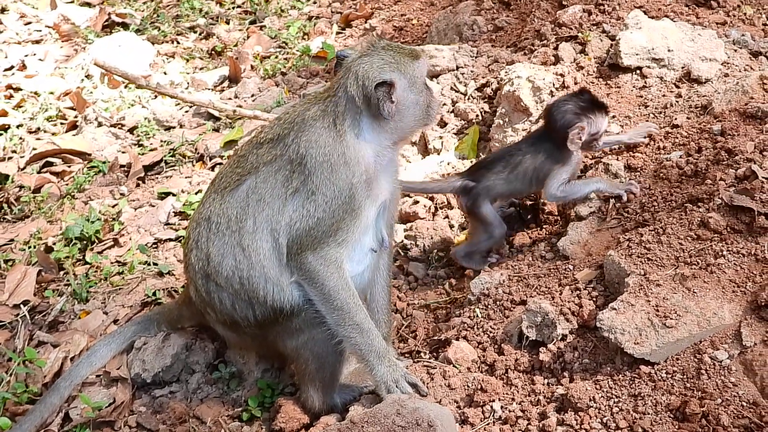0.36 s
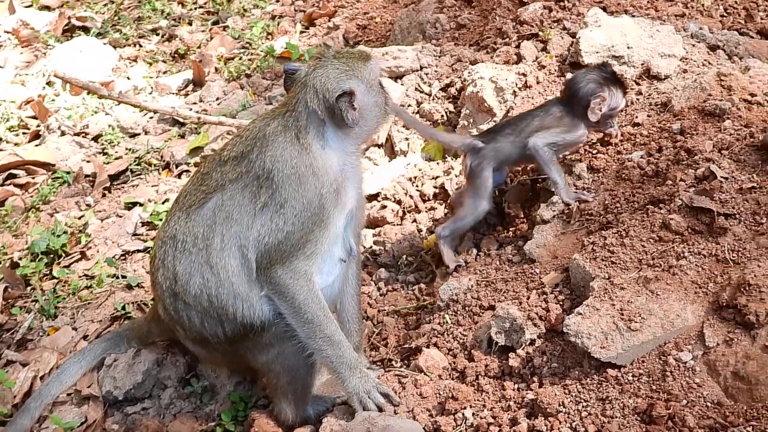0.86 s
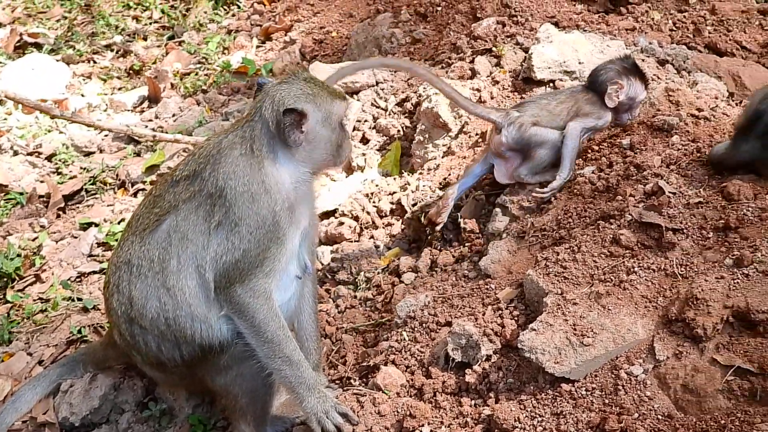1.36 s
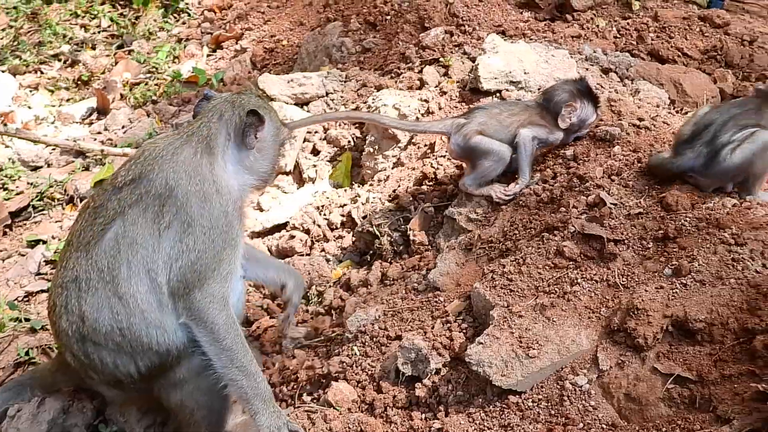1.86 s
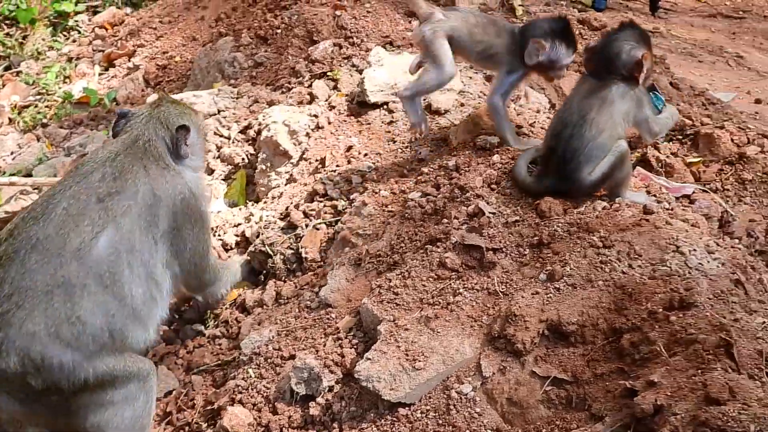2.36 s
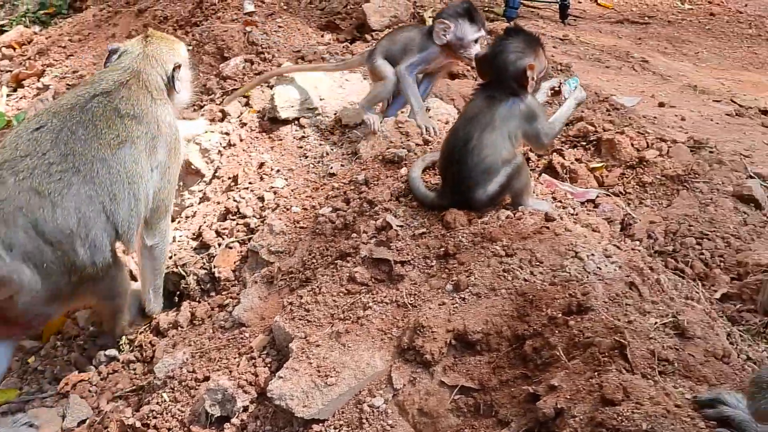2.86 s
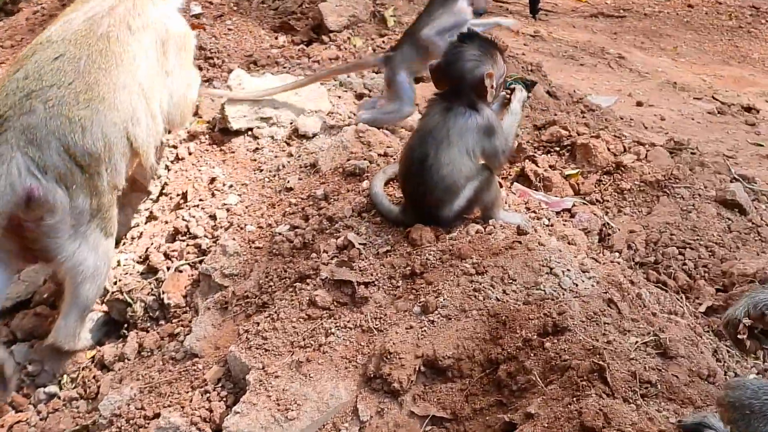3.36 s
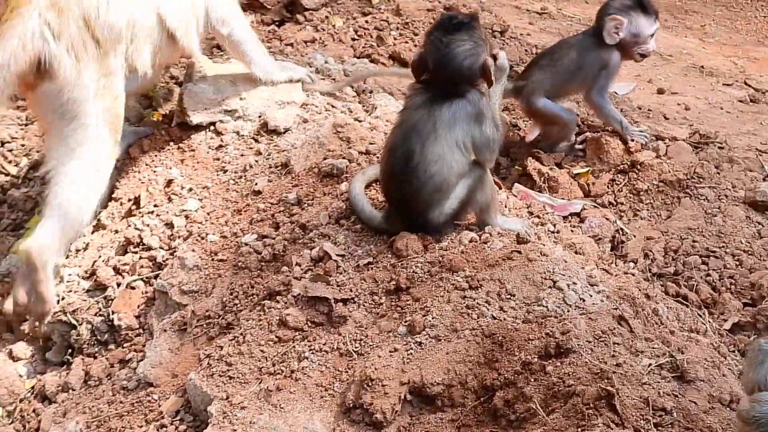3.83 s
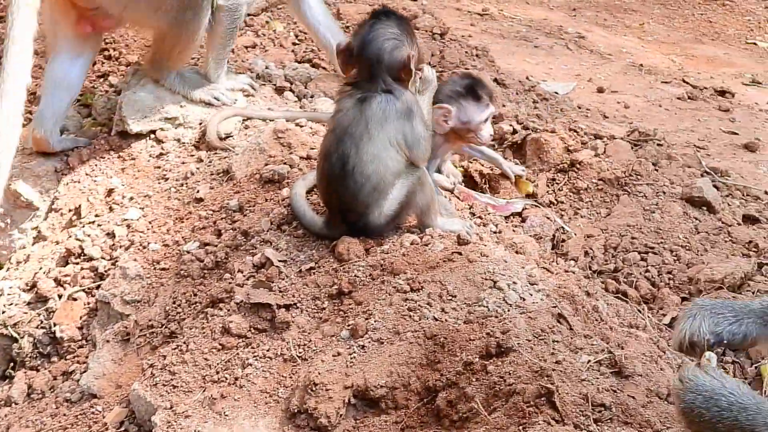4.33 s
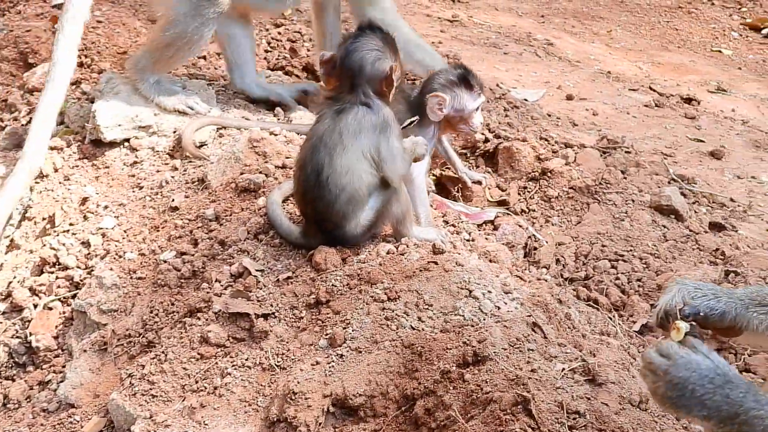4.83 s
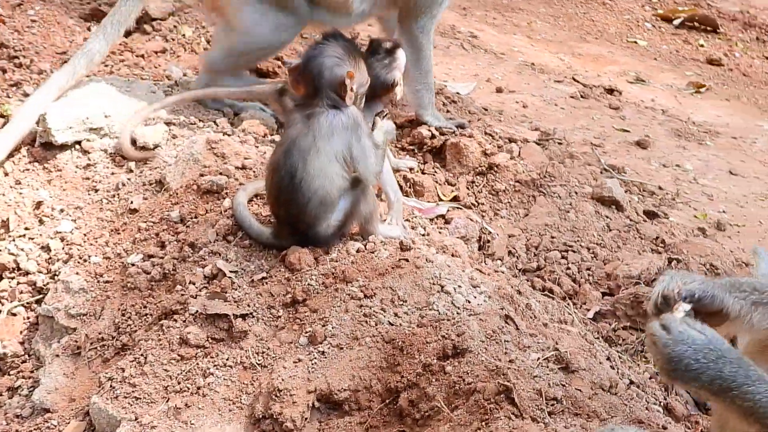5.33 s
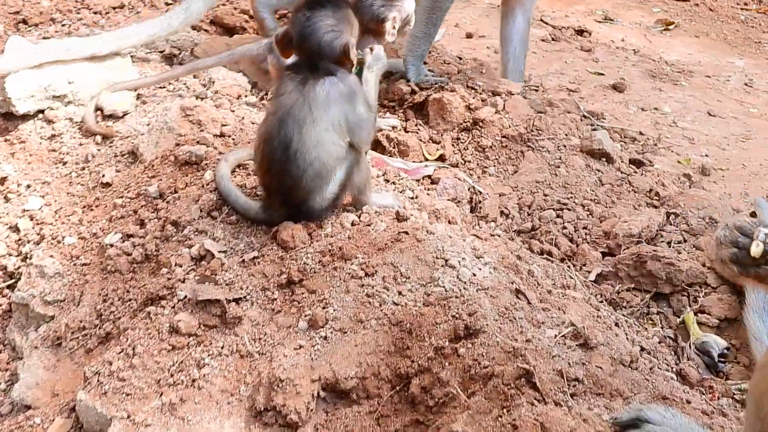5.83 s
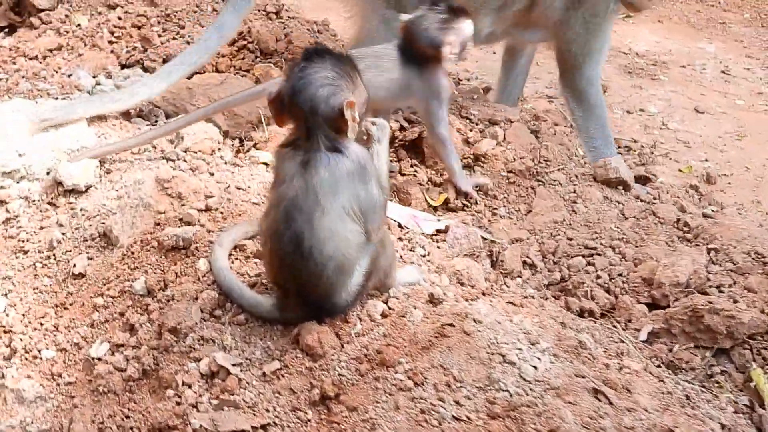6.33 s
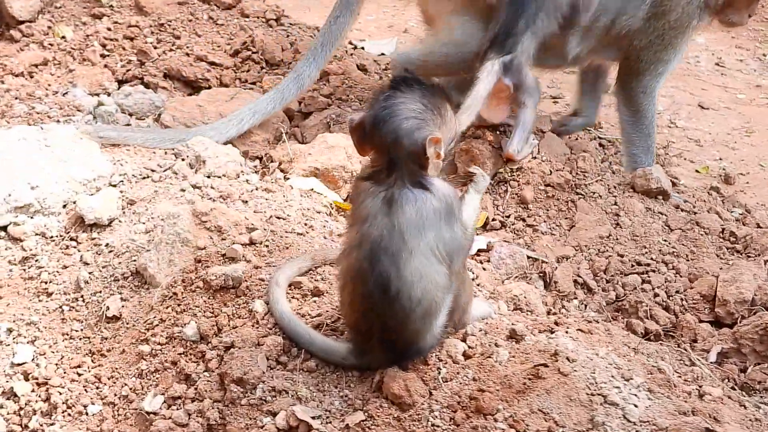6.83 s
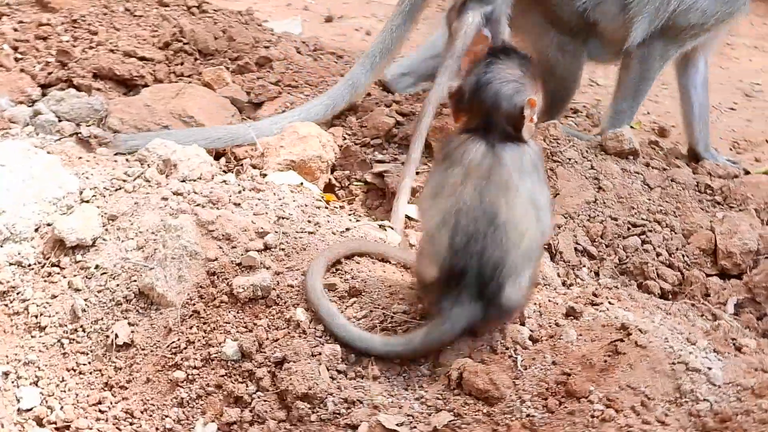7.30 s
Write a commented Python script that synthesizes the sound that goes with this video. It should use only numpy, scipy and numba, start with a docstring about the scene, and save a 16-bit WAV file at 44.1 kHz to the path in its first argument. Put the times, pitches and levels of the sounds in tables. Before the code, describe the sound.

Small feet scuff dry soil and gravel, pebbles tick, birds chirp faintly, then monkeys coo thinly and loudly as a twig snaps near the end.

```python
"""Monkeys coo thinly and clearly, louder at the end, on a mound of dry earth and gravel close to a small
camera with two microphone ports: gliding harmonics with breathy noise, and short single sliding tones.
A bird chirps in quick sine sweeps; noise tails make the echoes of both off the trees.
Feet scuff soil and gravel (coloured grains), stones tick, a twig snaps and a husk tips over (damped rings).
Soft outdoor hiss, made of filtered noise, lies under everything."""
import sys
import numpy as np
from scipy import signal
from scipy.fft import rfft, irfft, next_fast_len
from scipy.io import wavfile
from scipy.ndimage import uniform_filter1d, map_coordinates
from numba import njit

SR = 44100
rng = np.random.default_rng(int(sys.argv[2]) if len(sys.argv) > 2 else 0)


def store_wav(level_fs):
    """Save 16-bit WAV to argv[1]."""
    pcm = np.round(np.clip(np.atleast_2d(level_fs), -1, 1) * 32767)
    wavfile.write(sys.argv[1], SR, pcm.T.astype(np.int16))


def rack_gain(trim_db):
    """Turn a fader trim in dB into the linear factor to multiply a signal by."""
    fader = np.asarray(trim_db, float)
    return 10 ** (fader / 20)


N = 327924
T = np.arange(N) / SR
FFT_SIZE = next_fast_len(N)


def coloured(x, points, band):
    """Filter by (frequency [Hz], level [dB]) points; rms 1 inside the band [Hz]."""
    hz, db = np.transpose(points)
    f = np.maximum(np.fft.rfftfreq(FFT_SIZE, 1 / SR), 1)
    gain = rack_gain(np.interp(np.log(f), np.log(np.maximum(hz, 1)), db))
    spectrum = rfft(x, FFT_SIZE) * gain
    inside = (f > band[0]) & (f < band[1])
    band_power = 2 * np.sum(np.abs(spectrum[inside]) ** 2)
    return irfft(spectrum, FFT_SIZE)[:N] * FFT_SIZE / np.sqrt(band_power)


def walk(rate):
    """Random levels held 1 / rate s and slewed twice; spread near 1."""
    hold = int(SR / rate)
    steps = np.repeat(rng.standard_normal(N // hold + 1), hold)
    return 1.31 * uniform_filter1d(uniform_filter1d(steps, hold), hold)[:N]


def ports(x, lag_samples, pan_db=0.):
    """Both microphone ports hear x; the right one later by a lag, pan_db is left minus right."""
    late = np.fft.rfftfreq(FFT_SIZE) * lag_samples
    right = irfft(rfft(x, FFT_SIZE) * np.exp(-2j * np.pi * late), FFT_SIZE)[:N]
    return np.array([x * rack_gain(pan_db / 2), right * rack_gain(-pan_db / 2)])


def trees(x, t60, alike, gap_s):
    """Scattered echoes from trunks and leaves, partly alike at both ports; unit energy."""
    t = np.arange(int(1.2 * SR)) / SR
    decay = rack_gain(-60 * t / t60) * np.clip(t / gap_s, 0, 1)
    common, left, right = rng.standard_normal((3, len(t))) * decay
    tails = np.sqrt(alike) * common + np.sqrt(1 - alike) * np.array([left, right])
    return signal.fftconvolve(x[None], tails / np.sqrt(np.sum(common ** 2)), axes=1)[:, :N]


def glide(start, length, hz, db):
    """A sine that slides through evenly spaced pitches under a soft swell."""
    u = (T - start) / length
    swell = np.sin(np.pi * np.clip(u, 0, 1)) ** 0.5
    phase = 2 * np.pi * np.cumsum(np.interp(u, np.linspace(0, 1, len(hz)), hz)) / SR
    return np.sqrt(2) * rack_gain(db) * swell * np.sin(phase)


# colour of the distant leaves: (frequency [Hz], density [dB per Hz])
AIR_COLOUR = [(24, -70), (40, -31), (192, 0), (417, 1), (496, -7), (998, -1.5), (2920, -6), (3650, -4),
              (3930, -9.5), (4460, -7), (7710, -7), (10700, -25), (12100, -53), (13300, -76), (15500, -65)]


def air():
    """Distant leaves: smooth hiss, alike at both ports in the bass only."""
    mid, side = (coloured(rng.standard_normal(N), AIR_COLOUR, (40, 15000)) for _ in range(2))
    treble = signal.sosfilt(signal.butter(1, 1800, "highpass", fs=SR, output="sos"), side)
    side = treble * 0.25 + 0.32 * side
    return rack_gain(-53.5 + 0.39 * walk(0.44)) * (mid + side * np.array([[1], [-1]]))


# hiss of far insects and swept leaves: (start [s], end [s], centre [Hz], width [Hz], level [dB])
HISS_BANDS = [(-.15, .22, 5400, 1200, -49), (.49, .7, 3600, 1900, -48), (.6, .74, 2900, 1300, -45),
              (0.9, 1.16, 2760, 940, -54.5), (4.75, 6.1, 1920, 840, -56), (3.15, 3.88, 4600, 260, -55),
              (4.5, 5.0, 7800, 600, -64)]


def hisses():
    """Far insects and swept leaves: narrow wavering noise bands, different at each port."""
    out = np.zeros((2, N))
    for start, end, hz, width, db in HISS_BANDS:
        fade_s = min(0.28 * (end - start), .13)
        swell = np.clip(np.minimum(T - start, end - T) / fade_s, 0, 1) * rack_gain(db + 2.1 * walk(12))
        band = signal.butter(2, [hz - width / 2, hz + width / 2], "bandpass", fs=SR, output="sos")
        noise = signal.sosfilt(band, rng.standard_normal((2, N)))
        out += swell * np.sqrt(SR / 2 / width) * noise
    return out


# blows as the husk tips over: (time [s], level [dB])
HUSK_HITS = [(3.205, -46), (3.21, -41), (3.217, -36)]
# what the hollow husk rings with: (frequency [Hz], level against the blow [dB], time to fall 60 dB [s])
HUSK_MODES = [(313, -4, 0.066), (583, -4, 0.066), (740, -3, 0.061), (976, 5, 0.043), (1086, 0, 0.044),
              (1905, 4, 0.039), (1980, 0, 0.045)]


def husk():
    """A hollow husk tips over: each blow sets all its modes ringing with fresh strengths."""
    out = np.zeros(N)
    for s, blow_db in HUSK_HITS:
        t = np.clip(T - s, 0, 1)
        for (hz, db, t60), chance_db in zip(HUSK_MODES, 2.0 * rng.standard_normal(len(HUSK_MODES))):
            ring = np.sin(2 * np.pi * hz * t) * np.minimum(t / 0.0035, 1)
            out += rack_gain(blow_db + db + chance_db - 60 * t / t60) * ring
    return ports(out, 2.2)


def grains(rate, spread_db, points, band, alike, lag_samples):
    """Many small cracks (rate per second) of uneven size over a sliding hiss, partly alike at the ports."""
    layers = []
    for _ in range(3):
        hit, size, hiss = rng.random(N), rng.exponential(size=N), rng.standard_normal(N)
        strength = rack_gain(spread_db * np.minimum(size, 4.5)) * np.sqrt(SR / rate)
        cracks = (hit < rate / SR) * strength * np.sign(hiss)
        layers.append(coloured(cracks + 1.66 * hiss, points, band))
    return np.sqrt(alike) * ports(layers[0], lag_samples) + np.sqrt(1 - alike) * np.array(layers[1:])


@njit
def svf(x, hz, sharp):
    """State-variable band-pass with a moving centre."""
    y, band, low = np.empty(len(x)), 0., 0.
    for i in range(len(x)):
        g = np.tan(np.pi * hz[i] / SR)
        v = (band + g * (x[i] - low)) / (1 + g * (g + 1 / sharp))
        band, low, y[i] = 2 * v - band, low + 2 * g * v, v / sharp
    return y


def hollows(x, hz, sharp, plain, lift):
    """Gaps between the lumps lift one moving band of the rattle."""
    return plain * x + lift * np.array([svf(v, hz, sharp) for v in x])


def spells(rest_db, rest_hz, rows, rise_s, fall_s):
    """Gain and hollow pitch of a resting sound plus spells (start, length, dB, Hz); 10 dB per rise or fall."""
    power = rack_gain(rest_db) ** 2 + 0 * T
    pull = power * rest_hz
    for s, length, db, hz in rows:
        outside = np.maximum(0, np.maximum((s - T) / rise_s, (T - s - length) / fall_s))
        spell_power = rack_gain(db - 10 * outside) ** 2
        power, pull = power + spell_power, pull + spell_power * hz
    return np.sqrt(power), pull / power


# feet dragged through gravel: (start [s], length [s], stones level [dB], brightness [dB], hollow pitch [Hz])
GRAVEL_DRAGS = [(-.05, 0.21, -53.5, 0, 4960), (0.519, 0.17, -48.5, 3, 3320), (0.795, 0.086, -54, -2, 3500),
                (1.82, 0.068, -51, 3.5, 4100), (1.986, 0.034, -52, -2, 3000), (2.27, 0.058, -55.5, 7, 4200),
                (2.398, 0.073, -51, 3, 3800), (2.605, 0.068, -57, 1, 4100), (2.958, 0.024, -51, 0, 4100),
                (3.122, 0.037, -53.5, -1, 3800), (3.24, 0.039, -55, 10, 3900),
                (4.179, 0.062, -52.5, 4, 4300), (4.27, 0.031, -56, 12, 5230), (4.356, 0.03, -50.5, 9, 5900),
                (4.434, .012, -56, 3, 4500), (5.057, 0.04, -54, 4, 3800), (5.47, 0.23, -56, -11, 3400),
                (5.854, 0.13, -45, 1.5, 3620), (5.933, 0.11, -45, -4, 3800), (6.16, 0.073, -55.5, 5, 4140),
                (6.133, 0.0093, -37.5, 6, 3620), (6.435, 0.057, -45, -15, 4400),
                (6.584, 0.051, -51, -9, 4700), (6.776, 0.029, -34, 1, 3600), (6.819, 0.095, -33, 0, 4830),
                (6.932, 0.093, -33.5, 0.5, 4230), (7.03, 0.024, -32.5, 4.5, 4650),
                (7.063, 0.13, -47, -14.5, 3360), (7.2, 0.08, -48.5, -10, 3500)]


def gravel_drag(busy_db, fine_db, slope):
    """Gain and hollow pitch of one gravel layer; slope is dB of change per dB of brightness."""
    rows = [(s, length, db + slope * bright_db, hz) for s, length, db, bright_db, hz in GRAVEL_DRAGS]
    return spells(busy_db + slope * fine_db, 3800, rows, rise_s=0.014, fall_s=0.018)


# colours of what lies underfoot: (frequency [Hz], level [dB])
SOIL_COLOUR = [(120, -29), (220, -14), (350, 1), (450, -3.5), (700, -3.5), (1000, -9.5), (2000, -51)]
CLOD_COLOUR = [(300, -40.5), (650, 0.5), (1000, 1.5), (1600, 0), (2200, -5), (3500, -51)]
STONE_COLOUR = [(1000, -31), (2200, 0), (3600, -3), (4000, -5.5), (4600, 0.5), (6500, 0), (9000, -35)]
GRIT_COLOUR = [(3000, -45), (5200, -12), (7000, 0.5), (9000, -8), (12000, -20.5), (15500, -50)]
# how busy the feet are, on what and where:
# (time [s], stones level [dB], brightness [dB], left minus right of stones and grit [dB])
FOOT_ACTIVITY = [(0, -47, 1, 2), (.3, -55, 3, 3), (.5, -53.5, 0, -1), (.9, -50, 0.5, 0),
                 (1.4, -56.5, 0, 0.5), (1.8, -52, 2.5, 1.5), (2.2, -57.5, 1, 3.5), (2.6, -53, 4.5, 7),
                 (3.1, -55, -0.5, 5.5), (3.35, -50, -1.5, 2), (3.6, -52, 1, 2), (3.85, -51, 0.5, 5.5),
                 (3.95, -58, -2.5, 1), (4.6, -60, -2.5, 2.5), (4.95, -55.5, -1.5, 1), (5.3, -52.5, 0, 2),
                 (5.8, -48, -0.5, 1), (6.25, -44.5, 0, 1.5), (6.7, -45, -2, 0), (7.15, -44.5, 2.5, -1),
                 (7.44, -47.5, -4, -1)]
# loose soil sliding: (start [s], length [s], level [dB], hollow pitch [Hz])
SOIL_SLIDES = [(-.05, 0.18, -48.5, 520), (0.147, 0.21, -54.5, 412), (0.667, 0.068, -54.5, 395),
               (0.72, 0.29, -45.5, 460), (1.03, 0.21, -47.5, 400), (1.252, 0.2, -49.5, 400),
               (2.09, 0.33, -56.5, 443), (3.2, 0.009, -41, 606), (3.29, 0.45, -53, 443),
               (3.797, 0.27, -52.5, 400), (4.798, 0.42, -52.5, 612), (5.239, 0.025, -45.5, 450),
               (5.42, 0.38, -49.5, 460), (5.78, 0.055, -42.5, 415), (5.853, 0.23, -46, 520),
               (6.124, 0.027, -47.5, 597), (6.415, 0.063, -47.5, 604), (6.582, 0.1, -49.5, 700),
               (6.78, 0.021, -39, 670), (6.815, 0.24, -42.5, 690), (7.394, 0.12, -51, 450)]
# the feet move round to the left: (time [s], extra lag of the right port [samples])
FEET_MOVE = [(5.3, 0.), (5.8, 1.3), (6.7, 1.3), (7.2, 2)]


def scuffs():
    """Feet close by: soil slides dull, clods crumble, stones rattle, grit crackles, all as grains."""
    s, *columns = np.transpose(FOOT_ACTIVITY)
    busy_db, fine_db, pan_db = (np.interp(T, s, c) for c in columns)
    stones_gain, stones_hz = gravel_drag(busy_db, fine_db, 0)
    clods_gain, _ = gravel_drag(busy_db, fine_db, -0.54)
    grit_gain, _ = gravel_drag(busy_db, fine_db, 1.05)
    soil_gain, soil_hz = spells(-58, 520, SOIL_SLIDES, rise_s=0.0062, fall_s=0.041)
    soil = grains(150, 0.89, SOIL_COLOUR, (220, 700), 0.87, 1.5)
    soil = hollows(soil, soil_hz * (1 + 0.11 * walk(10)), 3.73, 0.48, 0.78)
    clods = grains(250, 1.44, CLOD_COLOUR, (1150, 1550), 0.76, 2.0)
    stones = grains(400, 2.5, STONE_COLOUR, (2200, 5800), 0.4, 1.72)
    stones = hollows(stones, stones_hz, 2.13, 0.63, 0.67)
    grit = grains(400, 2.5, GRIT_COLOUR, (7400, 11000), 0.22, 3.0)
    # grit and stones break loose together, in quick spurts
    spurts = walk(70)
    low = soil_gain * rack_gain(1.1 * walk(25)) * soil
    low += clods_gain * rack_gain(-7 + 2.3 * walk(25)) * clods
    high = stones_gain * rack_gain(1.5 * spurts + 1.1 * walk(11)) * stones
    high += grit_gain * rack_gain(-10 + 2.0 * spurts + 2.14 * walk(25)) * grit
    # the bright layers reach the right port later as the feet move left
    late = np.arange(N) - np.interp(T, *np.transpose(FEET_MOVE))
    high[1] = map_coordinates(high[1], [late], order=5, mode="mirror")
    return low + high * rack_gain(np.array([pan_db, -pan_db]) / 2)


def knock(hz, t60, crack, octaves, rise_s, snap):
    """A damped ring with a noisy crack around it and a snap at the start; peak 1."""
    t = np.arange(int(.08 * SR)) / SR
    ring = np.sin(2 * np.pi * hz * t) + crack * rng.standard_normal(len(t))
    y = ring * rack_gain(-60 * t / t60)
    y *= 1 + snap * rack_gain(-60 * t / 0.0027)
    y *= np.clip(t / rise_s, 0, 1)
    edges = [hz / 2 ** octaves, min(hz * 2 ** octaves, 12000)]
    y = signal.sosfilt(signal.butter(3, edges, "bandpass", fs=SR, output="sos"), y)
    y = signal.sosfilt(signal.butter(2, 10500, fs=SR, output="sos"), y)
    return y / np.abs(y).max()


# pebbles trickling at random: (start [s], length [s], middle peak level [dB])
PEBBLE_SPELLS = [(1.6, 2.3, -38), (4.348, .04, -34), (5.86, .2, -33), (6.79, .25, -23)]
# how many pebbles in each of those spells, in that order: (count)
PEBBLE_COUNTS = (5, 8, 8, 16)


def trickles():
    """Small pebbles at chance moments, sizes and spots, as rows like the knocked stones."""
    rows = []
    for (s, length, db), count in zip(PEBBLE_SPELLS, PEBBLE_COUNTS):
        for when, size, pitch, spot in rng.random((count, 4)):
            peak_db = db + 6.3 * (size - .5)
            rows.append((s + length * when, peak_db, 3200 + 2700 * pitch, 14.0 * spot - 1.5))
    return rows


# stones knocked: (time [s], peak level [dB], ring [Hz], left minus right [dB])
STONE_TICKS = [(.5894, -36, 3500, 0), (0.617, -24, 3000, -1), (0.666, -25.5, 3430, 0),
               (1.074, -28.5, 5230, 5.5), (1.2193, -25, 3080, -3), (1.474, -36, 4950, 1),
               (1.5254, -31, 4000, 1), (1.558, -31, 3500, 0), (1.5763, -29, 3680, 0),
               (1.992, -27, 2600, -8), (2.108, -32, 6500, 5), (2.148, -36, 4500, 6), (2.314, -37, 6300, 3),
               (2.442, -35, 3000, 5), (2.468, -27, 3420, 6), (2.556, -32, 4970, 6), (2.58, -27, 3400, 8),
               (2.8645, -25, 6450, 4.5), (2.918, -35, 6000, 2), (3.004, -24, 3550, 5.5),
               (3.259, -36.5, 4530, 19), (3.3145, -34, 6000, 6), (3.3275, -33, 2600, 2),
               (3.4065, -31, 3000, 2), (3.5052, -26.5, 4950, 1.5), (3.5975, -26.5, 4400, 2),
               (3.7268, -26, 4220, -1), (4.182, -34, 5000, 8), (4.2015, -42, 4970, 5),
               (4.215, -31, 3280, 9), (4.228, -34, 5900, 8), (4.284, -40, 6540, 6),
               (4.2372, -29.5, 4300, 9), (4.2747, -37, 5910, 8), (4.296, -30, 6700, 10.5),
               (4.3497, -34, 5970, 8), (4.3794, -39, 5660, 2.0), (4.424, -29.5, 4560, 3),
               (5.107, -23, 6400, 4), (5.484, -37, 5500, 4), (5.843, -33, 6240, -3), (5.9535, -23, 5500, 5),
               (6.0204, -29, 4800, 1.0), (6.039, -28, 4440, 1), (6.103, -29, 8000, 1.5),
               (6.1245, -15, 6500, 5), (6.127, -19, 4000, 6), (6.1318, -15.5, 3700, 11),
               (6.45, -28, 5090, -4.5), (6.485, -33, 5100, -3), (6.7648, -32, 3270, -3),
               (6.796, -26, 2960, 6), (6.8773, -27, 5370, 5), (7.201, -26, 2270, 13)]
# a dry twig snaps: (time [s], peak level [dB], ring [Hz], time to fall 60 dB [s], left minus right [dB])
TWIG_SNAP = (7.0492, -9, 6500, .009, 5)
# dull noisy thuds, from clods landing, the husk's crunch and the rough start of a coo:
# (time [s], peak level [dB], ring [Hz])
DULL_THUDS = [(.617, -34.5, 700), (1.99, -39, 1900), (2.013, -35, 1950), (2.383, -38.5, 900),
              (3.053, -38.5, 406), (6.306, -30, 1600), (3.004, -36, 1320), (3.205, -33.5, 1420),
              (3.212, -37, 2300), (3.213, -27, 700), (5.107, -39, 1530), (5.242, -27.5, 540),
              (5.816, -31, 413), (5.845, -26.5, 1350), (6.15, -39, 800), (6.256, -27.5, 780)]


def knocks():
    """Damped noisy rings: stones and a twig bright and short; clods, husk crunch and a coo's start dull."""
    bright, dull = np.zeros((2, N + SR)), np.zeros(N + SR)
    stones = [(s, db, hz, .013, pan_db) for s, db, hz, pan_db in STONE_TICKS + trickles()]
    for s, db, hz, t60, pan_db in stones + [TWIG_SNAP]:
        y = rack_gain(db) * knock(hz, t60, crack=2.6, octaves=1.6, rise_s=0.0002, snap=.9)
        i = int(s * SR)
        bright[0, i:i + len(y)] += rack_gain(pan_db / 2) * y
        i += 2 + round(np.interp(s, *np.transpose(FEET_MOVE)))  # the right port hears it later
        bright[1, i:i + len(y)] += rack_gain(-pan_db / 2) * y
    for s, db, hz in DULL_THUDS:
        y = rack_gain(db) * knock(hz, 0.018, crack=2.35, octaves=1.2, rise_s=0.0012, snap=0.09)
        i = int(s * SR)
        dull[i:i + len(y)] += y
    return bright[:, :N] + ports(dull[:N], 1.9)


# bird chirps: (start [s], length [s], four evenly spaced pitches [Hz], level [dB])
BIRD_CHIRPS = [(1.495, 0.038, 7170, 6400, 6350, 6170, -41.5), (2.683, 0.037, 6020, 6030, 6470, 7000, -39.5),
               (3.647, 0.018, 7200, 7000, 6870, 6660, -43), (3.661, 0.03, 6500, 6350, 6540, 6960, -37),
               (5.08, 0.027, 7400, 6700, 6360, 6040, -41.5), (5.853, 0.055, 6720, 6450, 6430, 5900, -45.5)]


def bird():
    """Quick, slightly hoarse high sweeps from a tree, mostly heard through near and far echoes."""
    near_db, far_db = 0, -3
    chirps = sum(glide(s, length, hz, db) for s, length, *hz, db in BIRD_CHIRPS)
    chirps = chirps * (1 + .3 * walk(600))
    blurred = chirps * (.5 + .9 * walk(1500))  # moving leaves spread the far echo in pitch
    near = rack_gain(near_db) * trees(chirps, t60=.3, alike=0.28, gap_s=0.0097)
    far = rack_gain(far_db) * trees(blurred, t60=2.4, alike=0.14, gap_s=0.036)
    return ports(chirps, 0.92, -2.2) + near + far


def coo(rows, upper_db, rough):
    """One voice: gliding harmonics weighted by the mouth opening, breaking in hoarse and clearing."""
    s, hz, level_db, mouth_db = np.transpose(rows)
    edge = np.clip(np.minimum(T - s[0], s[-1] - T) / 0.0052, 0, 1)
    unsteady = 1 + .002 * walk(60) + .06 * rough ** 2 * walk(160)
    phase = 2 * np.pi * np.cumsum(np.interp(T, s, hz) * unsteady) / SR
    strong = rack_gain(np.interp(T, s, level_db))
    mouth = rack_gain(np.interp(T, s, mouth_db))
    first, second = strong * np.minimum(1 / mouth, 1), strong * np.minimum(mouth, 1)
    voice = first * np.sin(phase) + second * np.sin(2 * phase)
    # a hoarse voice skips every other beat: a line between the first two harmonics
    voice += .6 * rough ** 3 * strong * np.sin(1.5 * phase)
    # the upper harmonics come in late, fade more slowly than the loud low ones, and flicker
    follow = .33  # share of the low harmonics' dB swing that they follow
    upper = strong ** follow * strong.max() ** (1 - follow)
    onset = np.clip((T - s[0]) / .025, 0, 1) ** 2
    for k, db in zip((3, 4, 6), upper_db):
        voice += upper * rack_gain(db) * rack_gain(3.6 * walk(50)) * np.sin(k * phase) * onset
    # uneven breath spreads a noisy skirt around every partial, widest at the break
    hoarse = rough + .6 * np.exp(-np.abs(T - s[0]) / .012)
    return voice * np.sqrt(2) * edge * rack_gain(0.61 * walk(70)) * (1 + hoarse * walk(500))


# coos, one list each: (time [s], pitch [Hz], level of the stronger of the two low harmonics [dB],
# mouth opening as second over first harmonic [dB])
COO_TRACKS = [
    [(1.2, 991.6, -78, -20), (1.226, 1009, -45, -28), (1.278, 1038, -44.5, -28), (1.38, 1037, -41, -30),
     (1.432, 1031, -62, -20), (1.5, 1028, -52.5, -22), (1.54, 1019, -71, -10), (1.558, 1040, -51.5, -6),
     (1.68, 1013, -65, -8)],
    [(2.745, 860, -46, -24), (2.772, 910, -32.5, -24), (2.787, 910, -32.5, -24), (2.817, 861, -41.5, -21),
     (2.845, 825, -54, -9)],
    [(6.303, 827, -45, 1), (6.314, 835, -24.5, 13), (6.345, 852, -24, 18), (6.41, 846, -26, 15.5),
     (6.435, 856.5, -33.5, 7), (6.48, 850, -36, 3), (6.575, 860, -38.5, 14)],
    [(6.572, 902, -25, 10), (6.594, 907, -29, 2.5), (6.61, 921, -17, 11.5), (6.628, 922.6, -18, 16.5),
     (6.637, 956, -25.5, 3.5), (6.645, 967, -20, 12), (6.66, 951.5, -21.5, 8), (6.672, 874.5, -28.5, 5.5),
     (6.712, 861, -34.5, 0)],
    [(6.787, 858.4, -32, 4), (6.805, 873.2, -24, 6), (6.84, 881.4, -23, 9), (6.88, 880, -25.5, 13),
     (6.92, 881.7, -22, 16), (6.96, 885, -26, 11), (7.0, 880.5, -23.5, 2.5), (7.022, 892.5, -25, 3),
     (7.032, 890, -31, 9), (7.055, 884, -33, 10)],
    [(7.045, 901, -30, 3), (7.07, 890, -37, 5), (7.1, 900, -43, 7), (7.13, 890, -39, 6),
     (7.16, 905, -43, 14), (7.195, 886, -47, 14)],
    [(7.19, 914, -40, 16), (7.22, 909, -48, 14), (7.28, 906, -51, 10), (7.31, 913, -37.5, 25),
     (7.345, 908, -40, 25), (7.38, 917, -34.5, 25), (7.44, 922, -38.5, 9)],
]
# colour of each coo: (third, fourth, sixth harmonic against the stronger low one at its loudest [dB],
# echo [dB], roughness [0-1], left minus right [dB], lag of the right port [samples])
COO_TONES = [(-33, -42, -42, -31, 0.16, 6, 1.9), (-22, -35, -42, -22, 0, -0.5, 1.1),
             (-47, -45, -23.5, -15, 0.07, -2.5, 1.7), (-37, -44, -43, -4, 0.1, -1.5, 1.3),
             (-29.5, -44, -25, -12, 0.14, 0.5, 2), (-24.5, -38, -30, -5, .9, 2, 2.8),
             (-34, -18, -37, -1.5, 0.33, 6.5, 2.8)]
# short single tones, from peeps and from lone overtones and between-harmonic lines of the coos:
# (start [s], length [s], start pitch [Hz], end pitch [Hz], level [dB])
SINGLE_TONES = [(2.72, .0085, 927, 950, -46), (6.432, .029, 1826, 1770, -34),
                (6.445, .044, 1093, 1153, -36.5), (6.556, .029, 1040, 1024, -36),
                (6.569, .037, 1327, 1370, -33.5), (6.575, .04, 3000, 3080, -50),
                (6.585, .06, 5420, 5530, -47), (6.597, .13, 1355, 1328, -48.5),
                (6.625, .04, 3820, 3870, -46), (6.63, .04, 4800, 4830, -49), (6.63, .035, 2850, 2900, -50),
                (6.635, .105, 5500, 5460, -49), (6.66, .06, 2680, 2640, -51), (6.66, .1, 3850, 3880, -51),
                (6.668, .045, 1800, 1720, -29), (7.027, .04, 913, 962, -36), (7.065, .065, 990, 1050, -39),
                (7.128, .042, 1085, 1100, -35.5), (7.171, .03, 1020, 1010, -43),
                (7.245, .05, 870, 885, -42)]


def monkeys():
    """Harmonic coos close to the ports, short single tones (peeps, lone lines of the coos), and echoes."""
    near, far = np.zeros((2, N)), np.zeros(N)
    for rows, (*upper_db, echo_db, rough, pan_db, lag_samples) in zip(COO_TRACKS, COO_TONES):
        voice = coo(rows, upper_db, rough)
        near += ports(voice, lag_samples, pan_db)
        far += rack_gain(echo_db) * voice
    tones = sum(glide(s, length, hz, db) for s, length, *hz, db in SINGLE_TONES)
    tones = tones * (1 + 0.35 * walk(350)) * rack_gain(2.8 * walk(45))
    echoes = trees(far + rack_gain(-9.5) * tones, t60=1.0, alike=0.8, gap_s=0.02)
    return near + ports(tones, 1.0, -.6) + echoes


def scene():
    """Everything at the two ports, from the distant leaves to the monkeys."""
    return air() + hisses() + husk() + scuffs() + knocks() + bird() + monkeys()


def low_pass(x):
    """Removes everything above the highest recorded frequency."""
    return signal.sosfilt(signal.butter(12, 15950, fs=SR, output="sos"), x)


def record(dry):
    """The camera cuts the bass against wind with a 100 Hz high-pass."""
    thin = signal.sosfilt(signal.butter(2, 100, "highpass", fs=SR, output="sos"), dry)
    return low_pass(thin)


dry = scene()
out = record(dry)
store_wav(out)
```